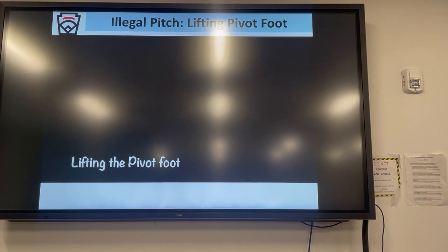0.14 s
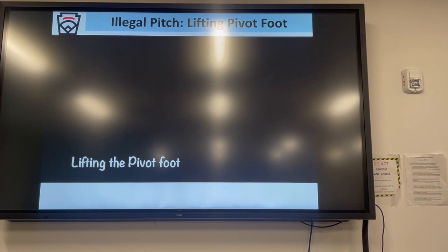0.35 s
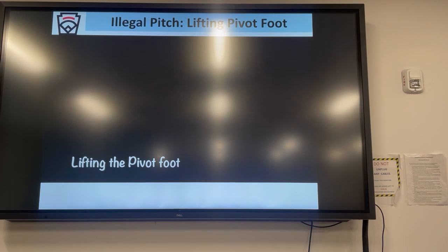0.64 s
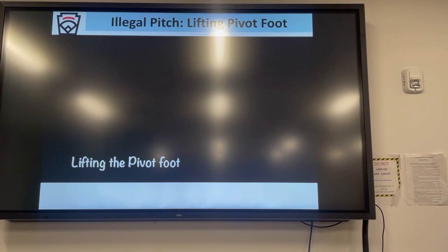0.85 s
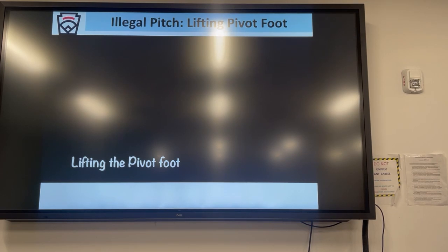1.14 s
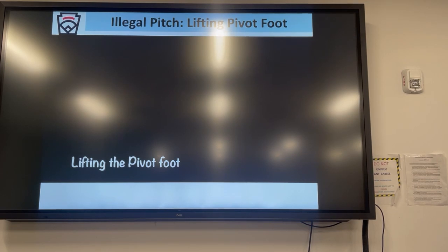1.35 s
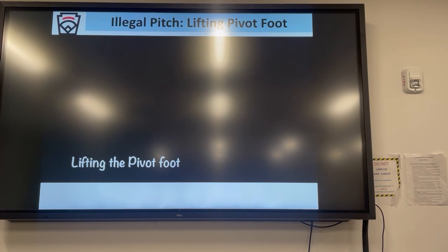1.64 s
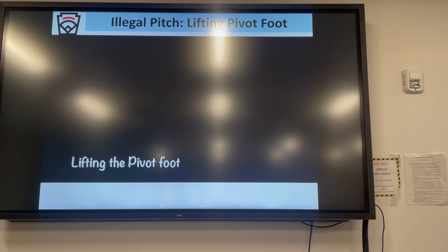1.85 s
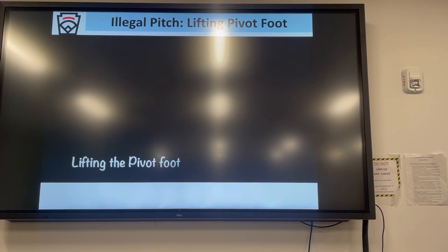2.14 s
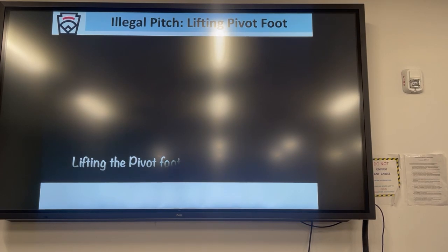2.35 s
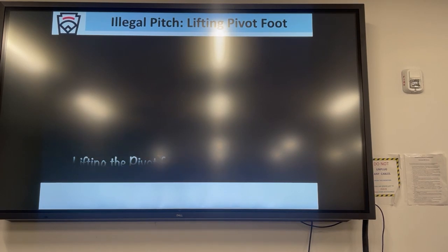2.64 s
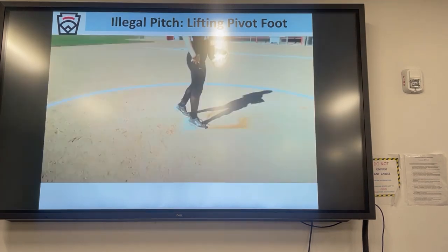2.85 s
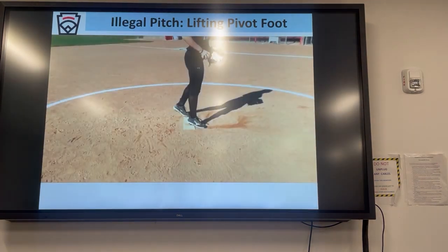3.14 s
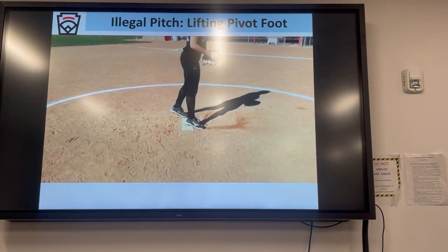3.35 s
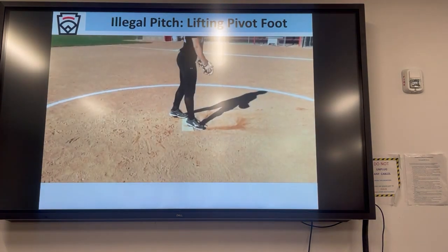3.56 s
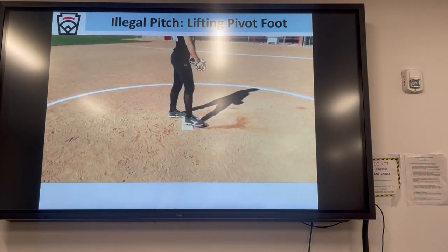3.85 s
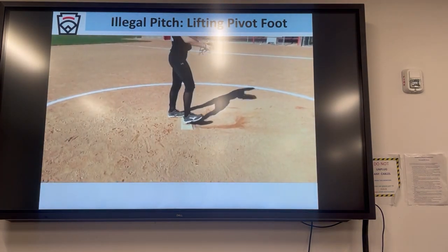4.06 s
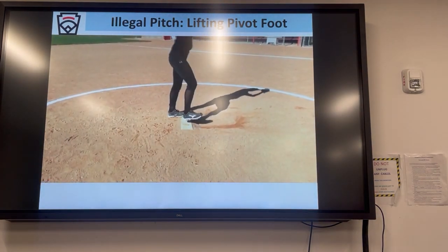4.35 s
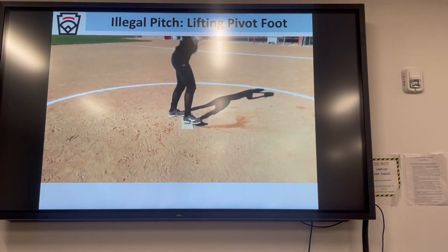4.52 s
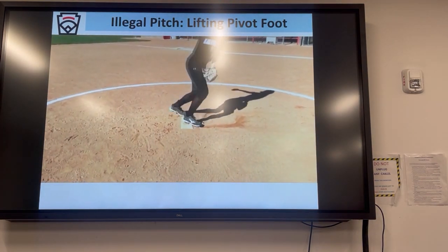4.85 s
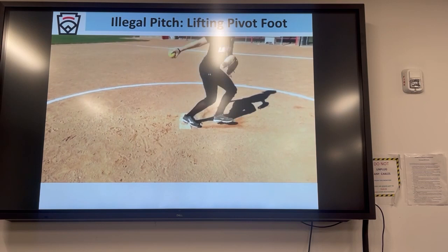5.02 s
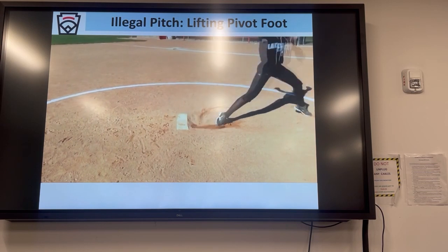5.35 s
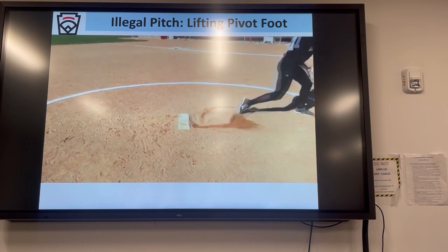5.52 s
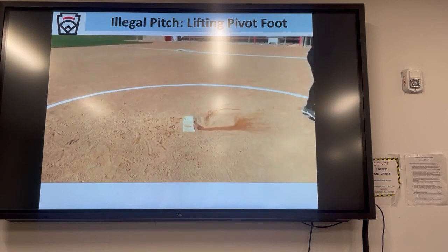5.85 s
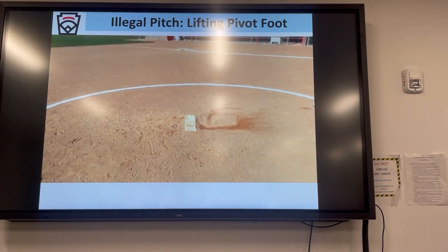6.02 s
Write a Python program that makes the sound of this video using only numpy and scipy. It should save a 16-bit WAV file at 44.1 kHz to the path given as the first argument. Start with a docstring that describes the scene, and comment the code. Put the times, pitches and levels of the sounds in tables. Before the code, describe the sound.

Quiet indoor room tone: deep, slightly wavering air-duct rumble, thin hiss, tiny regular camera ticks, faint hand rubbing and a few small clicks.

```python
"""A quiet meeting room, heard from a hand-held camera with two microphones.
Throughout, steady duct turbulence rumbles as noise in the low room modes, a fan motor hums in harmonics,
and air hisses at the vent. From the start the lens drive ticks once a picture as short damped rings.
From 0.1 s on the holding hand rustles in strokes of filtered friction noise over a steady faint grip.
Between 0.9 and 1.9 s the case creaks in tiny resonant clicks with a short room tail."""
import sys
import numpy as np
from scipy import signal
from scipy.fft import rfft, irfft
from scipy.io import wavfile

SR = 44100
rng = np.random.default_rng(int(sys.argv[2]) if len(sys.argv) > 2 else 0)


def wav_out(sig):
    """Save sig, one row per channel (or a flat mono array), as 16-bit PCM at SR to the path in sys.argv[1]."""
    wavfile.write(sys.argv[1], SR, np.round(np.clip(np.atleast_2d(sig).T, -1, 1) * 32767).astype(np.int16))


N = 272714  # length in samples


def from_db(db):
    """Logarithmic level: decibels to amplitude gain."""
    return 10 ** (np.asarray(db) / 20)


def bin_hz():
    """Discrete spectrum: frequency of each full-length bin, at least 1 Hz."""
    return np.maximum(np.arange(N // 2 + 1) * SR / N, 1)


def slope(points):
    """Spectral envelope: gain along straight lines in dB over log frequency."""
    hz, db = np.transpose(points)
    return from_db(np.interp(np.log(bin_hz()), np.log(hz), db))


def humps(modes):
    """Modal superposition: gain of resonances whose powers add."""
    power = 0
    for hz, width, db in modes:
        detuning = (bin_hz() - hz) / width
        power = power + (from_db(db) / (1 + 2 * detuning ** 2)) ** 2
    return np.sqrt(power)


def noise(gain):
    """Spectral shaping: Gaussian noise whose amplitude density per root Hz follows gain."""
    white = rng.standard_normal(N)
    return irfft(rfft(white) * gain, N) * np.sqrt(SR / 2)


def drift(rate):
    """Low-pass random modulation: slow noise with standard deviation 1, rolling off about rate Hz."""
    slow = noise(1 / (1 + (bin_hz() / rate) ** 2) ** 2)
    return slow / slow.std()


def resonate(x, hz, width):
    """Damped oscillator: a two-pole resonance with gain 1 on top."""
    radius = np.exp(-np.pi * width / SR)
    zeros = np.array([1, 0, -1]) * (1 - radius * radius) / 2
    poles = [1, -2 * radius * np.cos(2 * np.pi * hz / SR), radius * radius]
    return signal.lfilter(zeros, poles, x + 1e-18)


def strike(times, sizes, shape):
    """Impulse response: one short sound set off at each time with its own size."""
    hits = np.zeros(N)
    samples = np.clip(np.round(times * SR).astype(int), 0, N - 1)
    np.add.at(hits, samples, sizes)
    return signal.fftconvolve(hits, shape)[:N]


def stereo(mid, side):
    """Sum and difference: left and right from their common and differing parts."""
    return np.array([mid + side, mid - side])


def ports(analytic, lead, pan_db):
    """Two-point reception: the microphones differ in phase (lead/rad of the left) and level/dB."""
    left_right = []
    for sign in (1, -1):
        turned = np.real(analytic * np.exp(.5j * sign * lead))
        left_right.append(turned * from_db(.5 * sign * pan_db))
    return np.array(left_right)


FAN_HZ = 57.35
# Motor harmonics before the level curves: multiple of the turning rate [1], level/dB [rms]
HUM_HARMONICS = [(1, -44.5), (2, -49), (3, -58), (4, -72), (5, -58.5), (6, -63.5), (7, -70), (10, -83.5)]


def fan_hum(waver_db=1.0, sway=0.06):
    """Harmonic series: multiples of a nearly steady turning rate (sway in rad), each wavering in level."""
    turn = 2 * np.pi * FAN_HZ * np.arange(N) / SR + sway * drift(0.47)
    hum = np.zeros(N)
    for multiple, db in HUM_HARMONICS:
        amplitude = np.sqrt(2) * from_db(db + waver_db * drift(3.4))
        hum += amplitude * np.cos(round(multiple) * turn + rng.uniform(0, 2 * np.pi))
    return hum


def follow_level(x, band_hz, level, window_s=0.4, trim_db=-1.07):
    """Amplitude modulation: one band, evened in power, follows a level curve; the rest is unchanged."""
    in_band = (bin_hz() > band_hz[0]) & (bin_hz() < band_hz[1])
    band = irfft(rfft(x) * in_band, N)
    window = np.hanning(int(window_s * SR))
    weight = signal.fftconvolve(np.ones(N), window, "same")
    power = signal.fftconvolve(band ** 2, window, "same") / weight
    curve_db = np.interp(np.arange(N) / SR, *np.transpose(level))
    return x - band + band / np.sqrt(power) * from_db(trim_db + curve_db)


DEEP_HZ, UPPER_HZ = (45, 95), (122, 205)  # bands of the rumble that follow a level curve
# Low room modes before the level curves: f/Hz, width/Hz, level/dB [per Hz on top]
ROOM_MODES = [(41.2, 4.5, -61.5), (58.5, 18, -64.5), (78.7, 11.4, -58.5), (111.6, 6.5, -63.5),
              (132.7, 11.2, -59.5), (158.2, 5.5, -60.5), (173.1, 8, -61), (189.6, 8.2, -63),
              (209.9, 6, -71.5), (228.3, 7, -72), (256.3, 17, -79), (296, 18, -80), (433.3, 9, -83),
              (464, 14, -89)]
# Level curve of the rumble, 45-95 Hz: t/s, level/dB [rms, before trim_db]
DEEP_CURVE = [(0.0, -45.5), (0.418, -38.5), (0.57, -42), (1.201, -41.5), (1.35, -43), (1.83, -40.5),
              (1.92, -43), (2.73, -40), (3.36, -41), (3.45, -38), (3.6, -47.5), (3.72, -43), (3.87, -44),
              (4.35, -38.5), (4.771, -45.5), (4.889, -39.5), (5.07, -37), (5.22, -44.5), (5.37, -38.5),
              (5.82, -41.5), (6.031, -40.5), (6.18, -43)]
# Level curve of the rumble, 122-205 Hz: t/s, level/dB [rms, before trim_db]
UPPER_CURVE = [(0.0, -50), (0.3, -41), (0.81, -45.5), (0.901, -41.5), (1.14, -45), (1.529, -43.5),
               (1.89, -45.5), (2.039, -43), (2.25, -47), (2.4, -42.5), (2.699, -45.5), (3.09, -43),
               (3.69, -43.5), (4.02, -46.5), (4.17, -42), (4.769, -45.5), (4.92, -41), (5.1, -46.5),
               (5.43, -41.5), (5.58, -49.5), (5.7, -42.5), (6.18, -43.5)]
# Air noise common to both microphones: f/Hz, level/dB [per Hz]
AIR_COMMON = [(20, -88), (32, -76.5), (100, -73), (200, -79), (340, -81.5), (420, -88), (520, -90.5),
              (720, -96), (950, -99.7), (1250, -104), (1800, -112.5), (2400, -111.2), (3600, -122.5),
              (5500, -125.8), (7300, -129), (8400, -135), (10000, -131.5), (12000, -135)]
# Air noise of opposite sign at the two microphones: f/Hz, level/dB [per Hz]
AIR_DIFFERING = [(20, -101), (150, -87), (330, -103.5), (650, -94.5), (1000, -104), (1900, -125),
                 (3000, -125), (6500, -133), (8500, -128), (12000, -138)]
# Thin whistles of the vent grille: f/Hz, width/Hz, level/dB [per Hz on top]
GRILLE_WHISTLES = [(2041, 14, -111), (2170, 15, -107), (2258, 15, -107), (2489, 15, -102), (2772, 20, -114),
                   (2879, 18, -113), (3205, 30, -116), (4590, 55, -118)]


def ventilation(whistle_db=0.0):
    """Modal excitation: steady turbulence rings the room modes with the hum; the vent hisses and whistles."""
    rumble = noise(humps(ROOM_MODES)) + fan_hum()
    rumble = follow_level(rumble, DEEP_HZ, DEEP_CURVE)
    rumble = follow_level(rumble, UPPER_HZ, UPPER_CURVE)
    hiss = stereo(noise(slope(AIR_COMMON)), noise(slope(AIR_DIFFERING)))
    air = hiss + from_db(whistle_db) * noise(humps(GRILLE_WHISTLES))
    return ports(signal.hilbert(rumble), lead=-0.37, pan_db=-.5) + air * from_db([[-.2], [.2]])


PICTURE_HZ, FIRST_PICTURE_S = 29.97, .0135
# nominal level/dB of a nudge: any picture, every second, every fifth (weak and strong in turn)
IDLE_DB, SECOND_DB, FIFTH_WEAK_DB, FIFTH_STRONG_DB = -66.5, -60, -61.5, -56.5
# Lens nudges with their own level, strong and weak, set on the nearest picture:
# t/s, level/dB [nominal peak, before hard_db]
OWN_LEVEL_NUDGES = [(0.019, -54), (0.119, -56.5), (0.181, -53.5), (0.515, -52), (0.85, -52), (1.184, -51),
                    (1.517, -54), (1.716, -56), (1.85, -56), (1.985, -57), (2.184, -54.5), (2.315, -54),
                    (2.517, -52), (2.85, -53), (3.185, -52.5), (3.317, -53), (4.02, -56), (4.189, -51.5),
                    (4.521, -50.5), (4.684, -51), (4.99, -55), (5.355, -56.5), (5.52, -54), (5.853, -55),
                    (6.12, -58)]


def lens_drive(ring_hz=712, ring_spread=0.036, rise_s=0.0045, scatter_db=1.5, jitter_s=0.0006, own_db=-1.4):
    """Damped free vibration: a nudge each picture rings the lens on its springs, in a ten-picture cycle."""
    t = np.arange(SR // 20) / SR
    picture = np.arange(int(N / SR * PICTURE_HZ))
    second, fifth = picture % 2 == 1, picture % 5 == 0
    size, slip = rng.standard_normal((len(picture), 2)).T
    cycle_db = np.select([fifth & second, fifth, second],
                         [FIFTH_STRONG_DB, FIFTH_WEAK_DB, SECOND_DB], IDLE_DB)
    db = cycle_db + scatter_db * size
    times = FIRST_PICTURE_S + picture / PICTURE_HZ + jitter_s * slip
    for at, peak_db in OWN_LEVEL_NUDGES:
        db[np.argmin(np.abs(times - at))] = peak_db + own_db
    # each nudge draws one of five nearby pitches
    pitches = ring_hz * (1 + ring_spread * np.array([0.14, 0.1, 0.54, 0.94, 1]))
    dealt = rng.integers(len(pitches), size=len(picture))
    swell = t / rise_s * np.exp(1 - t / rise_s)
    nudges = np.zeros(N)
    for k, hz in enumerate(pitches):
        ring = swell * np.sin(2 * np.pi * hz * t)
        nudges += strike(times, from_db(db) * (dealt == k), ring)
    return ports(signal.hilbert(nudges, 2 * N)[:N], lead=1.0, pan_db=1.0)


STROKE_PIVOT_HZ, STROKE_FLAT_HZ = 4000, 3000  # brightness tilts about the first, only above the second
STROKE_EDGE_ORDER = 4
GRIP_DB = -94  # friction of the resting hand, before level_db
# Rubbing colour common to both microphones: f/Hz, level/dB [per Hz, relative]
RUB_COMMON = [(500, -32), (1500, -17), (2600, -23.5), (4200, -27), (5600, -32.5), (7600, -33.5),
              (8500, -48), (9600, -34), (11300, -33.5), (12500, -51)]
# Rubbing colour of opposite sign at the microphones: f/Hz, level/dB [per Hz, relative]
RUB_DIFFERING = [(1000, -36), (3500, -33.5), (6800, -38), (7900, -28), (9500, -36.5), (10700, -43.5),
                 (12000, -40.5)]
# Edges of the independently flickering bands: f/Hz
FLICKER_EDGES = (0, 2000, 4000, 8000, 16000)
# Strokes of skin and sleeve: middle t/s, length/s [between 1/e points], level/dB [peak, before level_db],
# tilt/dB [per octave: sleeve dull, fingertip bright], low edge f/Hz [higher for a lighter touch]
HAND_STROKES = [(0.11, 0.21, -85.5, -2.5, 900), (0.522, 0.48, -89.5, -0.5, 1500),
                (0.82, 0.15, -91.5, 2, 3000), (0.97, 0.2, -90, -1.5, 1000), (1.21, 0.26, -93, 0.5, 2000),
                (1.49, 0.16, -94, 5.5, 3500), (1.715, 0.2, -86, 1, 2200), (1.925, 0.16, -89.5, -4.5, 2200),
                (2.36, 0.07, -101, 6, 5000), (2.65, 0.083, -100, 4, 5000), (2.81, 0.3, -90.5, -7.5, 1300),
                (2.84, 0.22, -99, -4, 8000), (3.35, 0.11, -87.5, -1, 5000), (3.5, 0.38, -93, -5, 2800),
                (3.9, .08, -98, 3.5, 5500), (4.24, 0.55, -97, 1.5, 3000), (4.845, 0.032, -97, 6, 6000),
                (5.22, 0.06, -102, 6, 4000), (5.549, 0.036, -85.5, 1, 3500), (5.84, 0.19, -94, -3, 4500),
                (6.06, .07, -100, 4, 7000)]


def rubbing(level_db=-5.5, grain_db=1.0, unsteady_db=1.5):
    """Friction noise: bell-shaped strokes of coloured hiss over a steady grip, flickering band by band."""
    t = np.arange(N) / SR
    hiss = stereo(noise(slope(RUB_COMMON)), noise(slope(RUB_DIFFERING)))
    spectrum = rfft(hiss)
    octaves = np.log2(np.maximum(bin_hz(), STROKE_FLAT_HZ) / STROKE_PIVOT_HZ)
    rub = from_db(GRIP_DB) * hiss
    for at, length, db, tilt_db, edge_hz in HAND_STROKES:
        low_cut = np.hypot(1, (edge_hz / bin_hz()) ** STROKE_EDGE_ORDER)
        colour = from_db(tilt_db * octaves) / low_cut
        bell = np.exp(-(2 * (t - at) / length) ** 2)
        rub = rub + from_db(db) * bell * irfft(spectrum * colour, N)
    spectrum = rfft(rub)
    flickering = np.zeros((2, N))
    for low, high in zip(FLICKER_EDGES, FLICKER_EDGES[1:]):
        in_band = (bin_hz() >= low) & (bin_hz() < high)
        flickering += irfft(spectrum * in_band, N) * from_db(unsteady_db * drift(21))
    grain = from_db(level_db + grain_db * drift(64))
    return flickering * grain * from_db([[-.6], [.6]])


ROOM_T60_S = .32
PORT_LAG_S = .00006  # a creak reaches the left microphone this much later
# Ring of the case, shared by every creak: f/Hz, width/Hz, level/dB [added to the creak's case share]
CASE_RING = [(2310, 180, 5), (5700, 1100, -8), (11000, 1100, -12)]
# Creaks: t/s, level/dB [peak before the low-pass], ring f/Hz, ring width/Hz,
# case ring share/dB, room tail share/dB
CASE_CREAKS = [(0.9123, -43, 2500, 3200, -15, -33), (0.9159, -56, 1500, 1200, -12, -33),
               (0.9177, -53, 2200, 2200, -5, -31), (0.918, -55, 6400, 2000, -9, -28),
               (1.4667, -60, 4500, 700, -9, -29), (1.4672, -56, 10300, 900, -14, -34),
               (1.756, -51, 1210, 596, -17, -31), (1.8677, -58, 4200, 800, -9, -29),
               (1.8681, -49, 3760, 420, -4, -30), (1.8693, -52, 2210, 320, -12, -32)]


def case_body(x, ring_hz, ring_width, case_db):
    """Parallel resonators: a creak's own ring plus those of the case."""
    ringing = resonate(x, ring_hz, ring_width)
    for hz, width, gain_db in CASE_RING:
        ringing = ringing + from_db(case_db + gain_db) * resonate(x, hz, width)
    return ringing


def case_clicks(soft_hz=12000):
    """Impulsive excitation: sharp creaks ring the case, then decay exponentially in the room."""
    t = np.arange(SR // 2) / SR
    direct = (t == 0) * 1.0
    clicks = np.zeros((2, N))
    for at, db, ring_hz, ring_width, case_db, room_db in CASE_CREAKS:
        tails = rng.standard_normal((2, len(t))) * from_db(room_db - 60 * t / ROOM_T60_S)
        excitation = direct + stereo(tails[0], .5 * tails[1])
        peak = np.abs(case_body(direct, ring_hz, ring_width, case_db)).max()
        shapes = case_body(excitation, ring_hz, ring_width, case_db) / peak
        clicks += [strike(np.array([at]), from_db(db), shape) for shape in shapes]
    # a linear phase delays the left side
    clicks[0] = irfft(rfft(clicks[0]) * np.exp(-2j * np.pi * bin_hz() * PORT_LAG_S), N)
    low_pass = signal.butter(2, min(soft_hz, SR * .45), fs=SR, output="sos")
    return signal.sosfilt(low_pass, clicks) * from_db([[-.6], [.6]])


def scene():
    """Linear superposition: the room's ventilation plus the small sounds at the camera."""
    return ventilation() + lens_drive() + rubbing() + case_clicks()


CUTOFF_HZ = 12100


def record(dry):
    """Band limitation: a steep zero-phase elliptic low-pass cuts the top."""
    low_pass = signal.ellip(10, .1, 80, CUTOFF_HZ, fs=SR, output="sos")
    return signal.sosfiltfilt(low_pass, dry)


dry = scene()
out = record(dry)
wav_out(out)
```